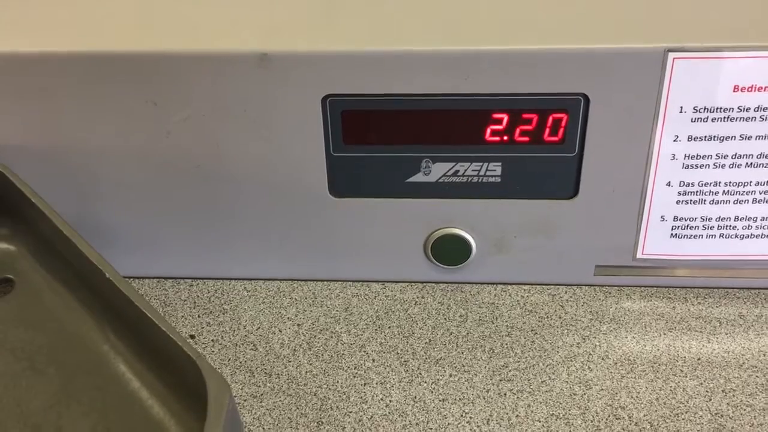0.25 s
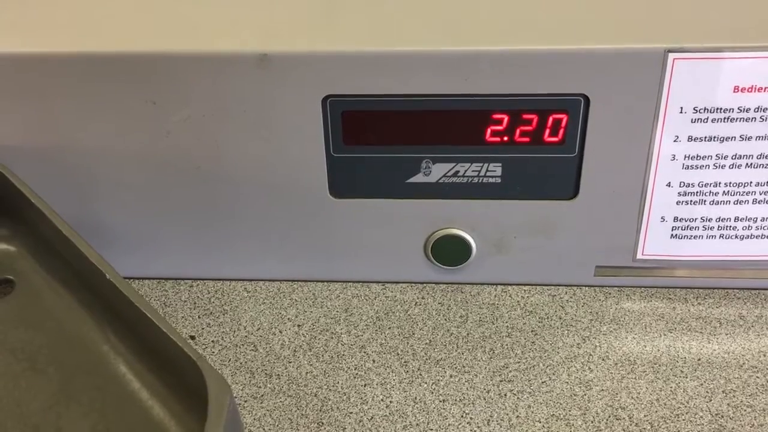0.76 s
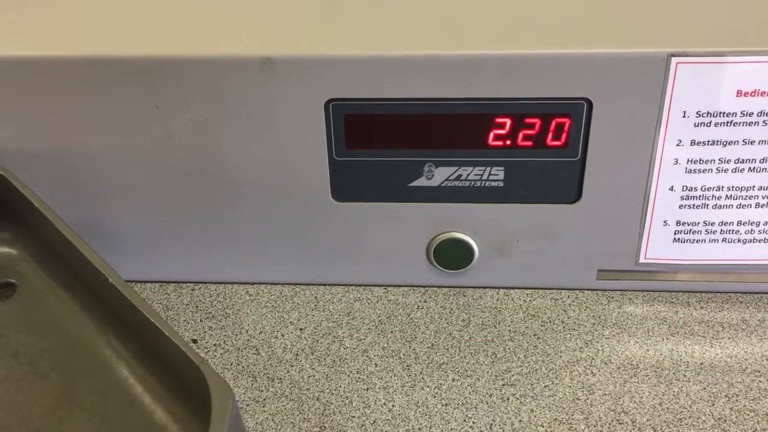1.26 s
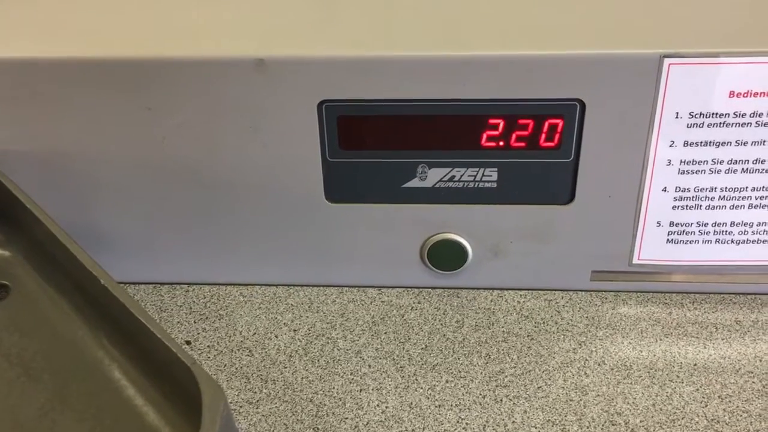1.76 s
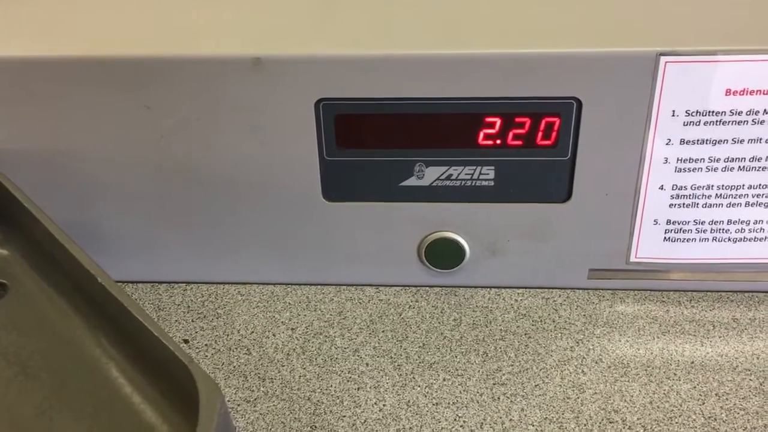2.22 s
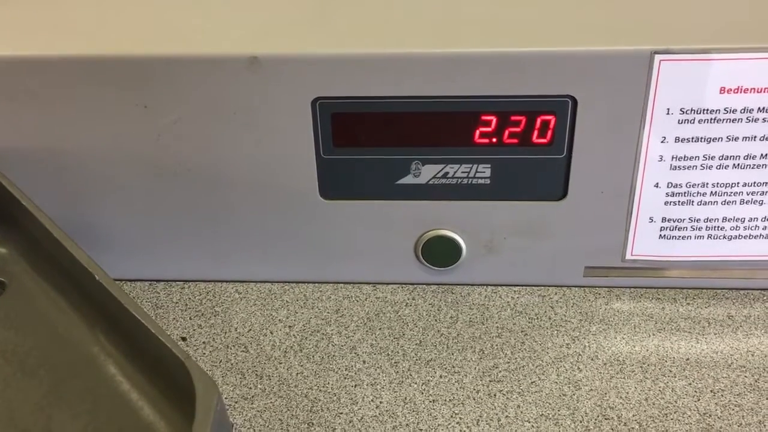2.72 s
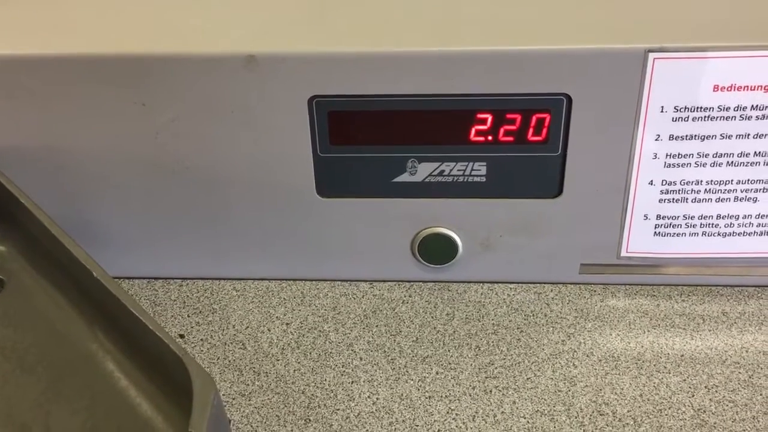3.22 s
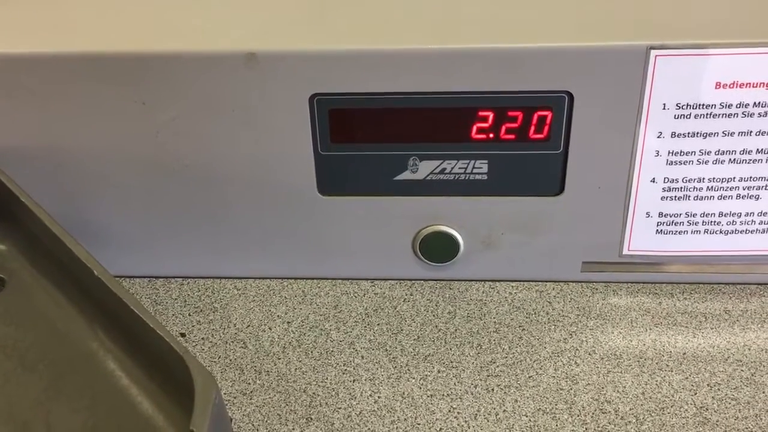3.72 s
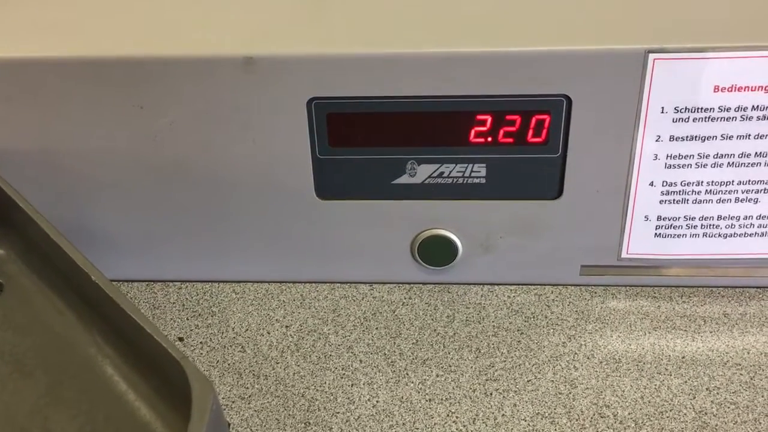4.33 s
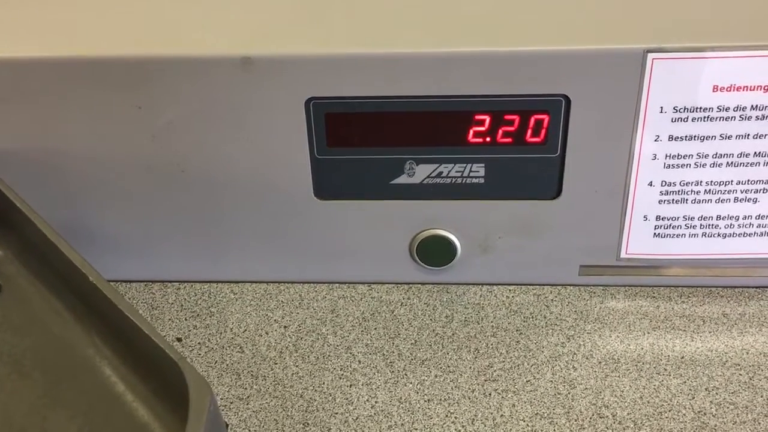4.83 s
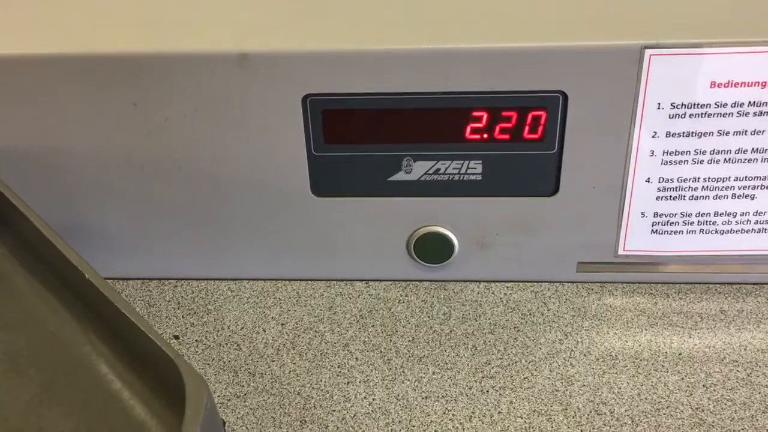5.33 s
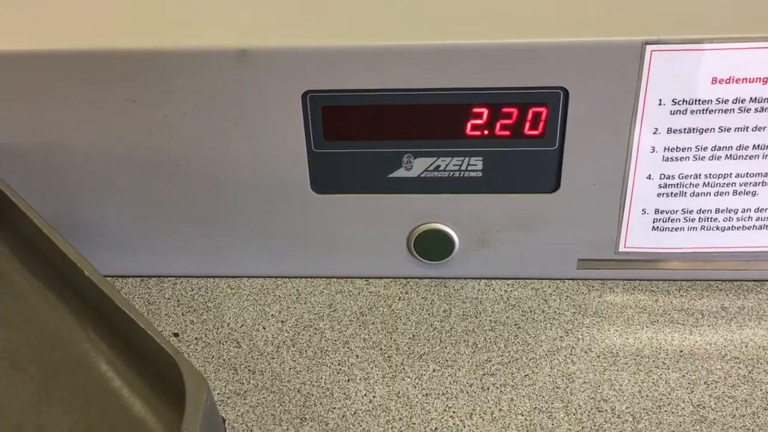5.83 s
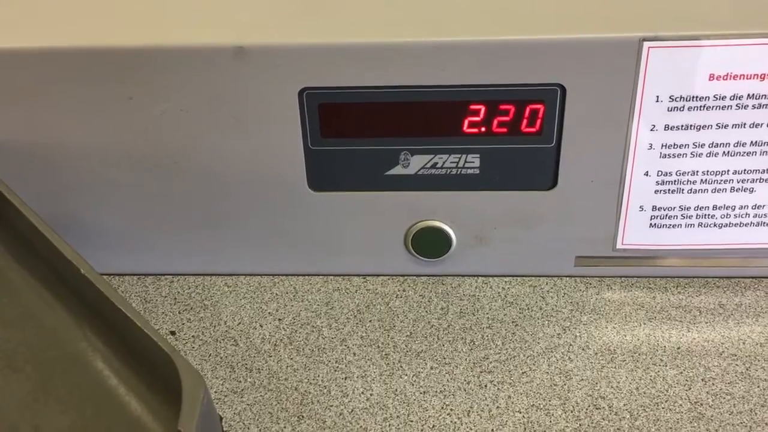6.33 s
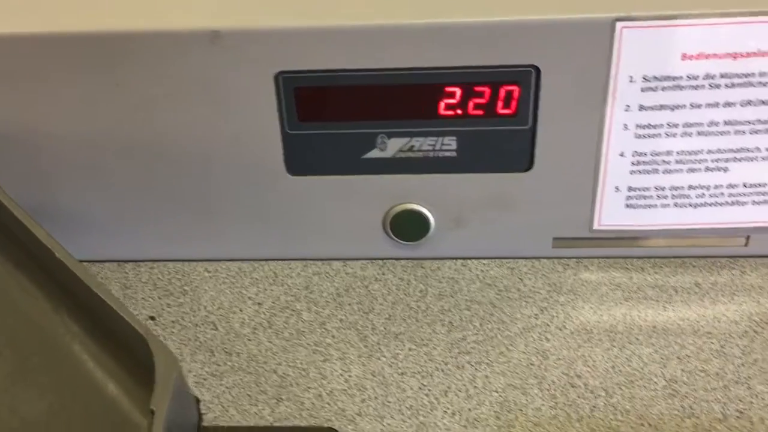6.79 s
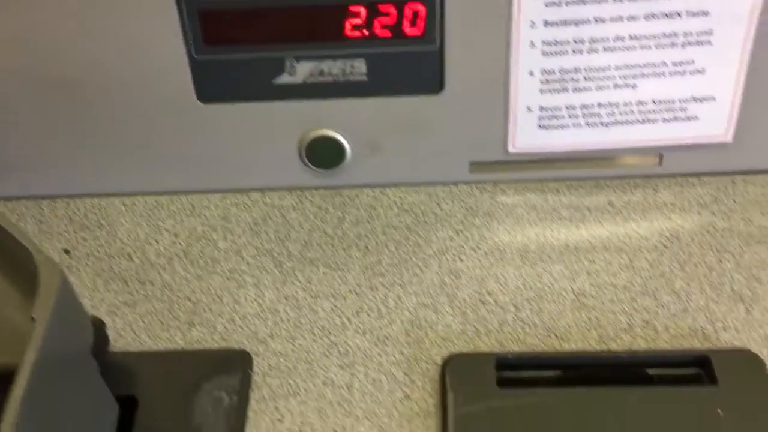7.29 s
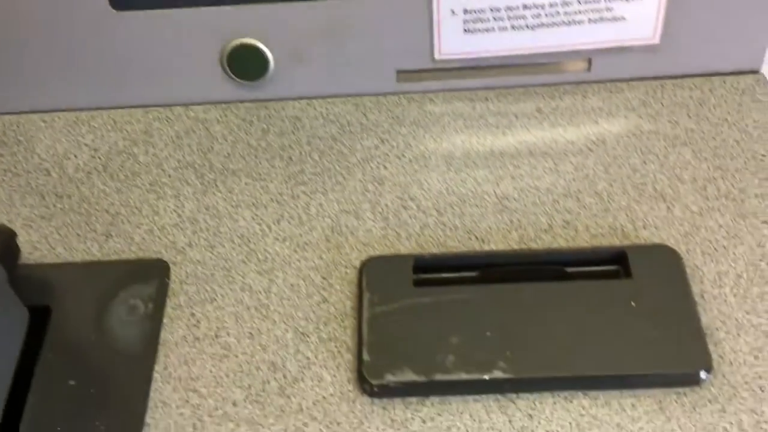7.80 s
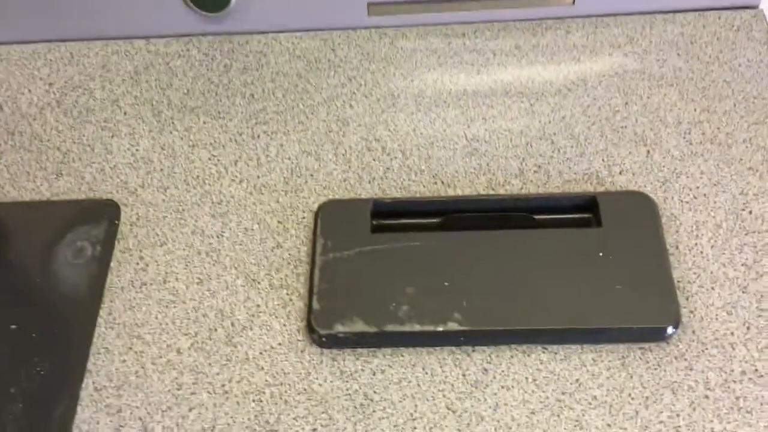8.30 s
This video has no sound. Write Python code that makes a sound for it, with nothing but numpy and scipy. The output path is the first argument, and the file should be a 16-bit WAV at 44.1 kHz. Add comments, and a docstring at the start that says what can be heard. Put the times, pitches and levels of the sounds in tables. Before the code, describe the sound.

A coin counting machine runs empty close by in a hushed hall, its motor humming while the sorting disc scrapes and whines. It coasts, rattles with light metallic tinkles, coasts again and restarts with a dull clunk. A deep drone creeps in behind it, slowly rising. Then the motor stops and a needle printer rasps out a receipt in short bursts, whirring and ticking.

```python
"""A coin counter runs empty in a hushed hall: its motor hums and shakes the cabinet while the sorting
disc scrapes round, whining and knocking. At 2.3 s it coasts, then rattles through a clearing stroke,
coasts again and restarts with a clunk at 4 s. Soon a deep drone creeps in behind it, slowly rising
in pitch. At 6.1 s the motor stops and a needle printer rasps out the receipt in short bursts, over its
whirring carriage, ticking ratchet and knocking paper feed."""
import sys
import numpy as np
from scipy import signal
from scipy.fft import rfft, irfft
from scipy.io import wavfile

SR = 44100
rng = np.random.default_rng(int(sys.argv[2]) if len(sys.argv) > 2 else 0)


def pcm_store(signal):
    """Save signal as 16-bit PCM."""
    levels = np.round(np.clip(np.atleast_2d(signal), -1, 1) * 32767)
    wavfile.write(sys.argv[1], SR, levels.astype(np.int16).T)


N = 377055
T = np.arange(N) / SR
BINS = np.fft.rfftfreq(8192, 1 / SR)


def amp(db):
    """Decibels to gain."""
    return np.exp(np.asarray(db) * (np.log(10) / 20))


def unit_rms(x):
    """Scales to rms 1."""
    return x / np.sqrt(np.mean(x ** 2) + 1e-20)


def since(s):
    """Seconds gone by since s, zero before."""
    return np.maximum(T - s, 0)


def gate(on, off, rise_s, fall_db_per_s):
    """Envelope of a part that starts up, holds and runs down."""
    return np.minimum(since(on) / rise_s, 1) ** 2 * amp(-fall_db_per_s * since(off))


def automation(points):
    """Straight lines through (time, value) breakpoints."""
    return np.interp(T, *np.transpose(points))


def at_hz(points, hz):
    """Reads (frequency, value) breakpoints on a log-frequency axis."""
    f, value = np.transpose(points)
    return np.interp(np.log(hz + 1), np.log(f + 1), value)


def add(mix, s, sound):
    """Mixes a sound in at s seconds."""
    part = mix[max(round(s * SR), 0):][:len(sound)]
    part += sound[:len(part)]


def wander(rate_hz):
    """Smooth random modulation of rms 1, rolling off above rate_hz."""
    hop = 64
    t = T[::hop]
    rolloff = 1 + (np.fft.rfftfreq(len(t), hop / SR) / rate_hz) ** 4
    slow = irfft(rfft(rng.standard_normal(len(t))) / rolloff, len(t))
    return unit_rms(np.interp(T, t, slow))


def rough_tone(phase, width_hz):
    """A narrow band of noise around a pitch."""
    return wander(width_hz) * np.cos(phase) + wander(width_hz) * np.sin(phase)


def eq(points):
    """Gain curve through (f/Hz, level/dB) breakpoints."""
    return amp(at_hz(points, BINS))


def peaks(modes, column=2):
    """Gain curve of resonances given as (f/Hz, width/Hz, level/dB, ...)."""
    return np.sqrt(sum(amp(mode[column]) ** 2 / (1 + ((BINS - mode[0]) / (mode[1] * np.pi / 4)) ** 2) ** 2
                       for mode in modes))


def colour(x, gain):
    """Plays x through a minimum-phase filter of unit energy, shaped like the gain curve."""
    log_gain = np.log(np.maximum(gain / gain.max(), 1e-5))
    mirrored = np.r_[log_gain, log_gain[-2:0:-1]]
    impulse = np.fft.ifft(np.exp(np.conj(signal.hilbert(mirrored)))).real[:len(BINS)]
    return signal.oaconvolve(x, impulse / np.linalg.norm(impulse))[:N]


def grit(per_s, spread_db):
    """Tiny contacts of uneven size at random moments."""
    size = amp(spread_db * np.minimum(rng.exponential(1, N), 4))
    return unit_rms(size * rng.choice([-1, 1], N) * (rng.random(N) < per_s / SR))


def scatter(t60):
    """A dying burst of close reflections, energy 1."""
    t = T[:SR // 8]
    burst = rng.standard_normal(len(t)) * amp(-60 * t / t60)
    return burst / np.linalg.norm(burst)


def blows(hits, t60):
    """One short chatter for each (t/s, level/dB); the level is that of its first 2 ms."""
    out = np.zeros(N)
    for s, db in hits:
        burst = scatter(t60)
        add(out, s, amp(db) * burst / np.sqrt(np.mean(burst[:SR // 500] ** 2)))
    return out


def ring(hz, db, t60):
    """One freely dying mode."""
    t = T[:SR // 2]
    return amp(db - 60 * t / t60) * np.sin(2 * np.pi * (hz * t + rng.random()))


# EQ of the room tone: f/Hz, level/dB
HALL_EQ = [(18, -36), (30, -13), (53, -13), (71, -10), (134, -14.5), (210, -22.5), (374, -28.5),
           (461, -33.5), (1130, -29.5), (1350, -36.5), (1670, -36.5), (2830, -51.5), (16000, -68)]
def hall(level_db=-51.5):
    """The hush of the hall: a steady bed of dark noise."""
    return amp(level_db) * unit_rms(colour(rng.standard_normal(N), eq(HALL_EQ)))


# Motor runs, the second being the clearing stroke: on t/s, disc grips t/s, off t/s, hum level/dB,
# cabinet level/dB, rub level/dB, scrape level/dB, rub release/(dB/s), rim offset from the rub/dB
RUNS = [(-1, -1, 2.305, -32, -44, -47, -62.5, 70, -1), (2.73, 3, 3.605, -34.5, -48, -55, -68.5, 24, -8),
        (4.035, 4, 6.06, -32.2, -44.5, -48, -63, 75, 1)]
# Hum harmonics and gear tones: multiple of the hum, level/dB relative to its fundamental
HUM_HARMONICS = [(1, 0), (2, -13.5), (3, -18.5), (4, -17.5)]
GEAR_TONES = [(1.23, -25), (1.69, -27), (3.14, -27), (3.39, -24), (3.75, -24), (3.885, -21), (4.23, -22.5)]
def motor(hum_hz=100, rise_s=.19, coast_db=-7, sag_hz=22.03, sag_s=.08):
    """Magnetic hum at twice the mains rate, wavering with the load. Returns the sound and its phase."""
    level, sag = np.zeros((2, N))
    for on, _, off, db, *_ in RUNS:
        powered = gate(on, off, rise_s, fall_db_per_s=330)
        # once the current is cut, a weaker hum lingers and sags in pitch as the rotor coasts
        coasting = amp(coast_db) * gate(on, off, rise_s, fall_db_per_s=68)
        level += amp(db) * np.maximum(powered, coasting)
        sag = np.where(T < on, sag, 1 - np.exp(-since(off) / sag_s))
    phase = 2 * np.pi * np.cumsum(hum_hz - sag_hz * sag) / SR
    hum = np.sin(phase) * amp(wander(23))
    for k, db in HUM_HARMONICS[1:]:
        gain = amp(db + 1.7 * wander(6.9))
        hum += gain * np.sin(k * phase + 2 * np.pi * rng.random() + .055 * wander(15))
    for ratio, db in GEAR_TONES:
        hum += amp(db) * np.sin(ratio * phase + 2 * np.pi * rng.random() + .74 * wander(4.4))
    return np.sqrt(2) * hum * level, phase


# Body EQ of the cabinet panels: f/Hz, level/dB
CABINET_EQ = [(70, -19.5), (84, -3), (100, -11), (118, -4.5), (141, -14.5), (175, -1), (212, -2.5),
              (245, -9), (280, -3.5), (330, -3), (385, -1.5), (420, -1), (455, -14), (520, -13),
              (620, -19.5), (800, -28.5), (1500, -52.5)]
RELEASE_LAG_S = .053
def cabinet(hum_phase, throb=.36, printer_db=-45.5):
    """Bearings and gears shake the panels in step with the torque ripple; later the printer shakes them."""
    ripple = 1 + throb * np.cos(hum_phase) * (T < 6.1)
    drive = grit(per_s=6000, spread_db=-.5) * ripple
    motor_shake = sum(amp(db) * gate(on, off + RELEASE_LAG_S, rise_s=.094, fall_db_per_s=56)
                      for on, _, off, _, db, *_ in RUNS)
    level = np.hypot(motor_shake, amp(printer_db) * printer_effort())
    return level * unit_rms(colour(drive, eq(CABINET_EQ)))


# The disc at full sorting speed: from t/s, until t/s
SPINS = [(.255, 2.29), (4.51, 6.05)]
def disc_pressure(grip_s=.049, scrape_fade=2.2, spin_rub_db=-46.5, spin_scrape_db=-56):
    """Envelopes of rim, rub and scrape; the last two firm up at sorting speed, and the rub dies slowest."""
    rim, rub, scrape = np.zeros((3, N))
    for _, grip, off, _, _, rub_db, scrape_db, release, rim_db in RUNS:
        bright = gate(grip, off, grip_s, release * scrape_fade)
        rub += amp(rub_db) * gate(grip, off, grip_s, release)
        rim += amp(rub_db + rim_db) * bright
        scrape += amp(scrape_db) * bright
    spin = sum(gate(on, off + RELEASE_LAG_S, rise_s=.058, fall_db_per_s=66) for on, off in SPINS)
    rub = np.hypot(rub, amp(spin_rub_db) * spin)
    scrape = np.hypot(scrape, amp(spin_scrape_db) * spin ** scrape_fade)
    return rim, rub, scrape


# EQ of the disc rubbing on its track: f/Hz, level/dB
RUB_EQ = [(330, -10), (520, 1), (620, -2), (760, -11), (950, -2.5), (1060, -4.5), (1220, -2), (1350, -7),
          (1460, -3.5), (1620, -5.5), (1790, -10.5), (2000, -8), (2150, -15), (2300, -10.5), (2550, -13.5),
          (2850, -17), (3590, -22), (5000, -23.5), (8000, -50)]
# Resonances of the steel disc and its rail: f/Hz, width/Hz, level/dB
STEEL_MODES = [(4100, 190, 4), (5400, 1000, -5), (6100, 700, 1), (6900, 700, -2), (8000, 1200, -3),
               (9250, 800, -5.5), (9980, 500, -1.5), (11250, 900, -2.5), (12180, 500, -3.5),
               (12850, 900, -6.5), (13550, 600, -7.5), (14950, 900, -8.5)]
def disc(hum_phase, throb=.056, rim_trim_db=-14, scrape_trim_db=1.5, dull_hz=6800):
    """The disc rubs on its track; pressed against the rail, it also sets the steel ringing."""
    rim_gain, rub_gain, scrape_gain = disc_pressure()
    contact = amp(.76 * wander(44)) * (1 + throb * np.cos(hum_phase))
    rub = colour(contact * grit(per_s=3500, spread_db=.5), eq(RUB_EQ))
    rim = colour(contact * grit(per_s=3700, spread_db=-.5), peaks([(4077, 125, -2.5), (4370, 3700, -18.5)]))
    scrape = unit_rms(colour(contact * grit(per_s=9700, spread_db=2), peaks(STEEL_MODES)))
    track = rub_gain * unit_rms(rub * amp(wander(6)))
    track += rim_gain * amp(rim_trim_db) * unit_rms(rim * amp(wander(16)))
    # a light touch on the rail is duller than a firm one
    press_db = 20 * np.log10(scrape_gain + 1e-9)
    firm = np.interp(press_db, [-64, -58], [0, 1])
    dull = unit_rms(signal.filtfilt(*signal.butter(1, dull_hz, fs=SR), scrape))
    rail = amp(press_db + scrape_trim_db) * (firm * scrape + (1 - firm) * dull)
    fade_out = np.interp(T, [6.1, 6.18], [1, 0])
    return fade_out * (track + rail)


# Knocks of the turning mechanism: t/s, level/dB before the trim
KNOCKS = [(.149, -41), (2.135, -33), (2.841, -49), (2.871, -38.5), (2.896, -37), (2.922, -39), (2.944, -40),
          (2.969, -40.5), (2.991, -40.5), (3.026, -42), (3.071, -39.5), (3.113, -38), (3.161, -33.5),
          (3.196, -39), (3.24, -34.5), (3.281, -41), (3.361, -36), (3.408, -43), (3.452, -36.5),
          (3.479, -40.5), (3.527, -40), (3.561, -41.5), (3.613, -44), (3.928, -48), (3.972, -57)]
# Their EQ: f/Hz, level/dB
KNOCK_EQ = [(200, 2.5), (400, 15.5), (770, -7.5), (1250, 6), (1600, 3.5), (2100, -7.5), (2500, -1),
            (2750, -8.5), (3000, -3.5), (3400, -15), (3750, -9), (4050, -2.5), (4400, -11), (5500, -9),
            (6650, -9.5), (7000, -19), (8300, -16), (15000, -29)]
def knocks(trim_db=-4, per_spin=12, rattle_db=-43, spread_db=2.5, bounce_s=.009, bounce_db=-2.5):
    """Loose parts knock, fall back and strike again; each spin adds a lighter, random rattle."""
    hits = list(KNOCKS)
    for on, off in SPINS:
        times = rng.uniform(on, off, per_spin)
        hits += zip(times, rng.normal(rattle_db, spread_db, per_spin))
    bounces = [(s + bounce_s, db + bounce_db) for s, db in hits]
    return amp(trim_db) * colour(blows(hits + bounces, t60=.064), eq(KNOCK_EQ))


# Tones of the disc drive at full speed: f/Hz, level/dB
WHINES = [(485, -60), (514, -59), (598, -61), (872, -64), (930, -60), (950, -57), (969, -60), (1016, -63),
          (1079, -63), (1436, -64), (1518, -64), (1950, -68), (2032, -66)]
def whine(spin_up_s=.03, spin_down_s=.16, panel_hz=594, panel_width_hz=95, panel_db=14.5):
    """Gear tones follow the disc speed; those from 700-1000 Hz flare falling through a panel resonance."""
    speed = sum((1 - np.exp(-since(on) / spin_up_s)) * np.exp(-since(off) / spin_down_s)
                for on, off in SPINS)
    falling = np.gradient(speed) < 0
    out = np.zeros(N)
    for full_hz, db in WHINES:
        hz = full_hz * speed
        resonance_db = panel_db / (1 + ((hz - panel_hz) / panel_width_hz) ** 2)
        flare_db = resonance_db * falling * (700 < full_hz < 1000)
        out += amp(db + flare_db) * rough_tone(2 * np.pi * np.cumsum(hz) / SR, width_hz=7)
    return out * speed ** 1.2


# Catches of the disc: t/s, f/Hz, level/dB
CATCHES = [(.35, 944, -50), (1.38, 1490, -51), (1.6, 1445, -56), (1.77, 1470, -53)]
def catches(swell_s=.043):
    """The disc catches briefly: a ringing scrape swells and fades."""
    return sum(amp(db) * np.exp(-((T - s) / swell_s) ** 2) * rough_tone(2 * np.pi * hz * T, width_hz=45)
               for s, hz, db in CATCHES)


# Modes of a stray coin: t/s, f/Hz, level/dB, t60/s
PINGS = [(1.936, 12040, -45, 0.2), (5.106, 4633, -49, 0.2), (5.105, 12500, -59, 0.21)]
def coin_pings():
    """A stray coin is struck and rings, high and short."""
    out = np.zeros(N)
    for s, hz, db, t60 in PINGS:
        add(out, s, ring(hz, db, t60))
    return out


# Tinkle cues: t/s, level/dB before the trim, boost of the lowest mode/dB
TINKLES = [(2.825, -67, 3), (2.975, -62, -3), (2.9, -60, -2), (3.165, -57, -4), (3.245, -58, -4),
           (3.34, -55, -14), (3.63, -62, -2), (3.7, -68, 1), (3.77, -70, 0), (3.84, -69, 0)]
# Modes of the thin metal part: f/Hz, relative level/dB, t60/s
TINKLE_MODES = [(5400, -6, .4), (6220, -6, .35), (6450, -9, .35), (8400, -12, .2)]
def tinkles(trim_db=-1, spread_db=2.5, detune=.0122, attack_s=.014):
    """A thin metal part tinkles during the clearing stroke, its modes a little different each time."""
    out = np.zeros(N)
    for s, db, low_db in TINKLES:
        tinkle = 0
        for k, (hz, mode_db, t60) in enumerate(TINKLE_MODES):
            level_db = db + trim_db + mode_db + low_db * (k == 0)
            tinkle += ring(hz * rng.normal(1, detune), rng.normal(level_db, spread_db), t60)
        add(out, s, tinkle * np.minimum(T[:len(tinkle)] / attack_s, 1))
    return out


# EQ of the drive's clunk: f/Hz, level/dB
CLUNK_EQ = [(200, 2), (400, 9), (770, -4), (1500, 6), (2200, -7), (4000, -14), (6000, -18), (9000, -28),
            (15000, -35)]
def clunk(at_s=4.055, level_db=-44):
    """The drive takes hold with a dull clunk as the motor restarts."""
    return colour(blows([(at_s, level_db)], t60=.14), eq(CLUNK_EQ))


# Fader moves of the background drone: t/s, level/dB
DRONE_FADER = [(4.2, -70), (4.55, -51), (4.78, -40), (5.3, -48), (6.25, -42.5), (7.4, -50.5), (8.05, -44.5),
               (8.55, -58)]
def drone(climb_from_s=4.4, start_hz=33.43, first_second_hz=10, octave_db=-13, swell_db=-52):
    """A deep tone climbs ever more slowly; its octave swells for a moment near the top."""
    hz = start_hz + first_second_hz * since(climb_from_s) ** .53
    phase = 2 * np.pi * np.cumsum(hz) / SR
    level = amp(automation(DRONE_FADER))
    octave = amp(octave_db) * level + amp(swell_db) * np.interp(T, [7.6, 8.15, 8.55], [0, 1, .2])
    return np.sqrt(2) * (level * np.sin(phase) + octave * np.sin(2 * phase))


def carriage(level_db=-49.5, waver_db=1.8):
    """The small motor and gears that move the print head whirr throughout the printing."""
    body = peaks([(80, 25, 11), (221, 58, 15.8), (573, 180, 7.1), (940, 650, 1), (1495.6, 1600, 1.5)])
    whirr = unit_rms(colour(grit(per_s=2200, spread_db=.5), body))
    fade_in = np.interp(T, [6.05, 6.12], [0, 1])
    return amp(level_db + waver_db * wander(18)) * whirr * fade_in


def printer_effort(on_s=6.08, rise_s=.048, dip_at_s=7.31, dip_width_s=.33, dip_db=-5):
    """Envelope of the printer drive: it starts up, and eases for a moment midway."""
    dip = np.exp(-((T - dip_at_s) / dip_width_s) ** 2)
    return np.minimum(since(on_s) / rise_s, 1) * amp(dip_db * dip)


# Ratchet ticks of the carriage and ribbon drive: t/s, level/dB before the trim
RATCHETS = [(6.086, -43), (6.099, -40), (6.325, -40), (6.338, -36.5), (6.354, -42), (6.385, -47),
            (6.396, -44), (6.407, -35), (6.422, -38.5), (6.463, -43), (6.678, -35.5), (6.694, -34.5),
            (6.71, -41), (6.776, -47), (6.853, -42), (6.866, -37.5), (6.883, -40.5), (6.913, -54),
            (6.927, -44), (6.936, -40.5), (6.951, -43.5), (7.232, -44), (7.249, -52), (7.267, -48),
            (7.367, -52), (7.504, -51), (7.929, -44), (7.944, -46), (8.081, -42), (8.095, -37),
            (8.107, -40.5), (8.14, -49), (8.154, -41), (8.165, -39.5), (8.179, -39), (8.192, -49),
            (8.419, -37), (8.436, -38), (8.453, -54)]
def ratchet(trim_db=-.7, lead_s=.01, rise_s=.0019, t60=.045):
    """A pawl slides up a tooth, then snaps off: one short rasp a tick."""
    out = np.zeros(N)
    t = T[:SR // 12] - lead_s
    envelope = np.where(t < 0, np.exp(-(t / rise_s) ** 2), amp(-60 * t / t60))
    for s, db in RATCHETS:
        add(out, s - lead_s, amp(db + trim_db) * envelope * rng.standard_normal(len(t)))
    return out


# Steps of the paper feed: t/s, level/dB before the trim
FEED_STEPS = [(6.089, -40.5), (6.114, -33), (6.152, -37), (6.399, -41), (6.419, -32.5), (6.442, -36),
              (6.491, -39.5), (6.69, -32), (6.707, -37), (6.726, -36), (6.825, -38), (6.877, -37),
              (6.896, -35.5), (6.939, -37), (6.955, -33.5), (6.969, -37), (6.989, -43), (7.234, -37),
              (7.25, -39.5), (7.263, -34.5), (7.477, -39.5), (7.5, -40), (7.534, -39), (7.618, -41)]
# Modes of the hollow printer bay: f/Hz, relative level/dB, t60/s
BAY_MODES = [(270, -6.5, 0.077), (366.6, 0, 0.083), (505, -5.5, 0.054)]
def paper_feed(trim_db=3, detune=.077, attack_s=.0029):
    """Each step of the paper feed knocks on the printer bay, never quite at the same pitch."""
    out = np.zeros(N)
    for s, db in FEED_STEPS:
        pitch = rng.normal(1, detune)
        knock = sum(ring(hz * pitch, db + mode_db + trim_db, t60) for hz, mode_db, t60 in BAY_MODES)
        add(out, s, knock * np.minimum(T[:len(knock)] / attack_s, 1))
    return out


DOT_HZ = 1893.5  # dot columns a second; a character is eight columns and a gap of two
def needles(length_s, count=7, fire_chance=.55, repeat_chance=.72, direct=.38, swing_s=.0055):
    """Needles strike one run of characters. Returns their rasp and how hard they swing the head."""
    column = (T[:round(length_s * SR) + SR // 25] * DOT_HZ).astype(int)
    strike = np.diff(column, prepend=-1)
    slots = np.arange(column[-1] + 1)
    inked = (slots % 10 < 8) & (slots < length_s * DOT_HZ)
    # some characters take more dots than others
    density = fire_chance * rng.normal(1, .3, len(slots))[slots // 10]
    rasp, load = np.zeros((2, len(column)))
    for _ in range(count):
        fired = inked & ((rng.random(len(slots)) < density) | (slots < 2))
        # a needle tends to repeat its pattern from one character to the next
        pattern = np.r_[rng.permutation([-1, 1] * 4), 0, 0][slots % 10]
        push = np.where(rng.random(len(slots)) < repeat_chance, pattern, rng.choice([-1, 1], len(slots)))
        hits = strike * (fired * push)[column]
        rebound = signal.oaconvolve(hits, scatter(t60=.022))[:len(rasp)]
        rasp += direct * hits + rebound
        load += fired[column]
    swing = signal.lfilter([1], [1, -np.exp(-1 / (swing_s * SR))], load)
    filled = np.sqrt(length_s * SR / len(column))  # keeps the quiet tail from raising the level
    return filled * unit_rms(rasp), filled * unit_rms(swing)


# The ear moves to the paper slot and is away, nearing, above at: t/s
PERSPECTIVE_TIMES = [6.825, 7.117, 7.71]
# Partials of the buzz: multiple of the character rate, relative level/dB away, nearing, above
BUZZ_PARTIALS = [(5, -55, -56, -51), (10, -37.5, -41, -40), (18, -62, -56, -44.5), (19, -52, -50, -53),
                 (20, -37.5, -35.5, -41), (21, -46, -50, -50), (30, -41, -43.5, -44), (31, -54, -55, -47.5),
                 (32, -54, -47, -58), (37, -58, -60, -50), (40, -60, -52, -52), (45, -55, -60, -62),
                 (50, -57, -51, -49)]
def head_buzz(swing, dot_waver_db=1.74, between_waver_db=4):
    """The swinging head buzzes: dot-clock harmonics are steadier, the tones between come and go."""
    phase = (2 * np.pi * DOT_HZ * T + .24 * wander(22)) / 10
    out = np.zeros(N)
    for k, *place_db in BUZZ_PARTIALS:
        waver_db = between_waver_db if k % 10 else dot_waver_db
        level_db = np.interp(T, PERSPECTIVE_TIMES, place_db) + waver_db * wander(12)
        out += amp(level_db) * np.sin(k * phase + 2 * np.pi * rng.random())
    return swing * out


# Runs of characters: t/s, length/s, rasp level/dB before the trim, buzz gain/dB, ring boost/dB
PRINT_RUNS = [(6.132, 0.169, -32.5, 0, 0), (6.472, .18, -33.5, -2.5, 1), (6.793, 0.042, -33.5, -6, 0.5),
              (7.017, 0.051, -35, 2, 0.5), (7.144, 0.0054, -35, -12, -1), (7.181, .026, -33, 2, 0.5),
              (7.279, 0.039, -33, 0.5, 0), (7.338, .004, -36, -2, -1.5), (7.445, .025, -34, 0, 0.5),
              (7.521, 0.0037, -41, -4, 2), (7.607, 0.032, -33, -6, -1), (7.656, .066, -33, 0.5, -1),
              (7.79, .028, -32, -2, 0), (7.851, .0058, -34.5, -4, 1), (7.871, .0175, -31, -6, 2.5),
              (7.961, .02, -31, -1, 1.5), (7.995, 0.0043, -32, -4, -2), (8.02, .043, -33, -1, -1),
              (8.202, .026, -33.5, -4, 1), (8.283, .031, -33, -7, 3), (8.361, .034, -34, -4, 0.5),
              (8.466, 0.076, -37, -7, -1)]
# Resonances of print head and housing: f/Hz, width/Hz, level/dB away, nearing, above
HEAD_MODES = [(903, 236, -2.5, -4, -5.5), (1360, 1400, -10.5, -13, -16), (2000, 980, -8, -10, -11.5),
              (3010, 250, -8, -19, -11), (3440, 255, -11, -9, 3), (3910, 300, 4.5, 5, -1.5),
              (4460, 460, -5, -16, -16), (5340, 420, -18, -13, -4), (5875, 330, 2, 3, 0.5),
              (6430, 460, -2, -15, -15), (6930, 420, -16, -11, -.5), (7960, 480, -4, -0.5, -7),
              (8550, 380, -1, -9, -13), (8920, 400, -18, -16, -4), (9860, 600, -5.5, -9.5, -6),
              (11600, 870, -8, -10, -12), (12450, 1400, -11, -17, -8.5), (14900, 1900, -16, -19, -16)]
def printer(rasp_trim_db=-1.8, slide_db=-58, ring_band_hz=(3150, 4250)):
    """Needle strikes, ratchet ticks and an uneven sliding hiss ring the print head and its housing."""
    sliding = amp(slide_db + .5 * wander(45)) * printer_effort() ** 1.3
    drive = sliding * rng.standard_normal(N) + ratchet()
    swinging, out = np.zeros((2, N))
    for s, length_s, rasp_db, buzz_db, _ in PRINT_RUNS:
        rasp, swing = needles(length_s)
        add(drive, s, amp(rasp_db + rasp_trim_db) * rasp)
        add(swinging, s, amp(buzz_db) * swing)
    for k, place in enumerate(np.eye(len(PERSPECTIVE_TIMES))):
        crossfade = np.sqrt(np.interp(T, PERSPECTIVE_TIMES, place))
        out += crossfade * colour(drive, peaks(HEAD_MODES, column=2 + k))
    out += head_buzz(swinging)
    # some runs ring the main resonance of the head harder than others
    boost_db = automation([(s + length_s / 2, db) for s, length_s, _, _, db in PRINT_RUNS])
    band = signal.sosfiltfilt(signal.butter(2, ring_band_hz, "bandpass", fs=SR, output="sos"), out)
    return out + (amp(boost_db) - 1) * band


# Decay of the hall: f/Hz, t60/s
REVERB_DECAY = [(200, 0.46), (1000, 0.7), (4000, 0.18), (14000, 0.068)]
def reverb(x):
    """The hall answers with a diffuse tail whose treble dies first."""
    hz, t, noise = signal.stft(rng.standard_normal(SR // 2), SR, nperseg=256)
    decay = amp(-60 * t / at_hz(REVERB_DECAY, hz)[:, None])
    tail = signal.istft(noise * decay, SR, nperseg=256)[1]
    tail[:SR // 200] = 0  # 5 ms pre-delay
    return signal.oaconvolve(x, tail / np.linalg.norm(tail))[:N]


def scene(send_db=-13):
    """The machine in its hall, in mono; only the hits and the printing feed the reverb."""
    hum, hum_phase = motor()
    hits = knocks() + coin_pings() + tinkles() + clunk() + paper_feed() + printer()
    running = hum + cabinet(hum_phase) + disc(hum_phase) + whine() + catches() + carriage()
    return (hall() + running + hits + drone() + amp(send_db) * reverb(hits))[None]


def record(dry):
    """A steep high cut at 15.8 kHz on the master."""
    high_cut = signal.firwin(301, 15800, window=("kaiser", 8), fs=SR)
    return signal.oaconvolve(dry, high_cut[None], "same")


dry = scene()
out = record(dry)
pcm_store(out)
```